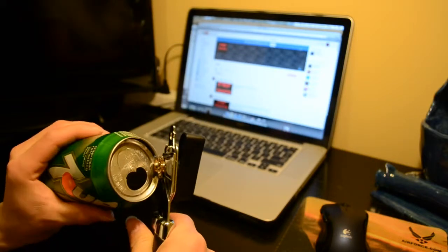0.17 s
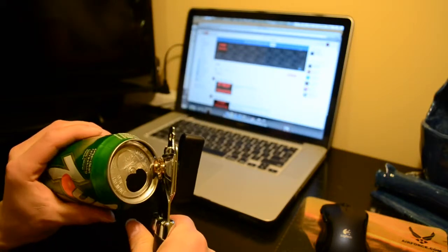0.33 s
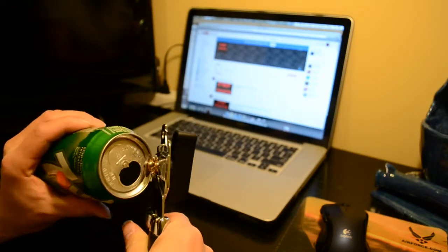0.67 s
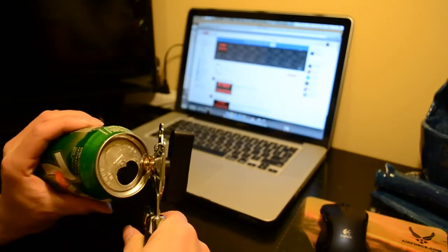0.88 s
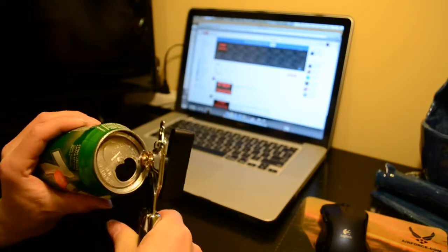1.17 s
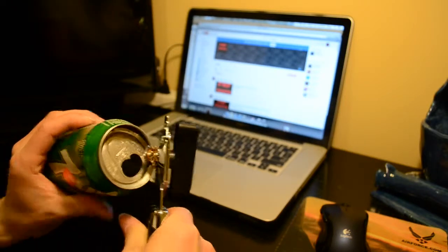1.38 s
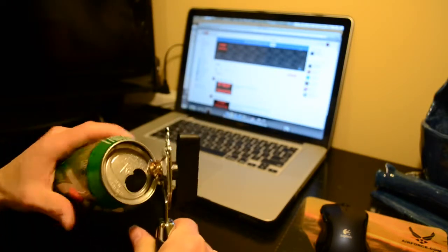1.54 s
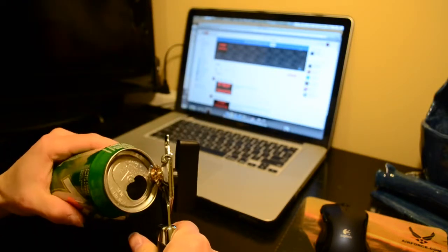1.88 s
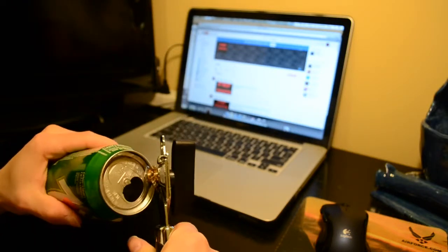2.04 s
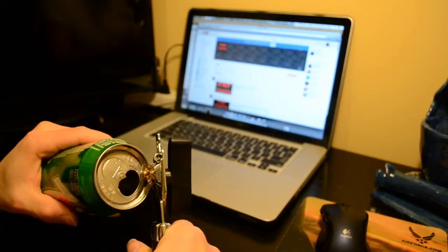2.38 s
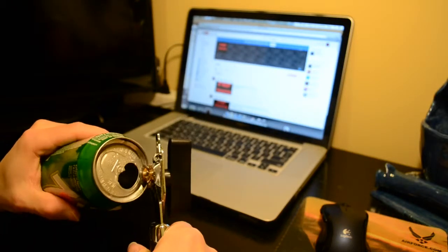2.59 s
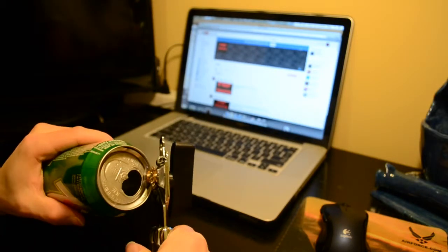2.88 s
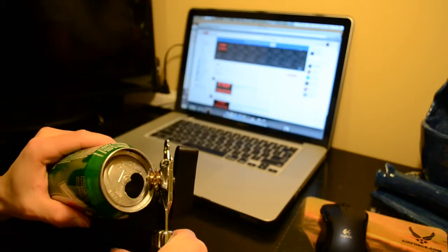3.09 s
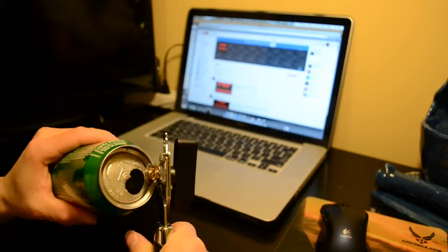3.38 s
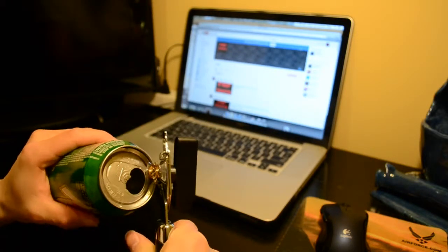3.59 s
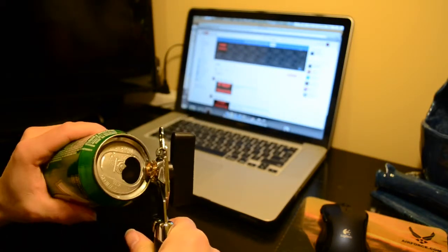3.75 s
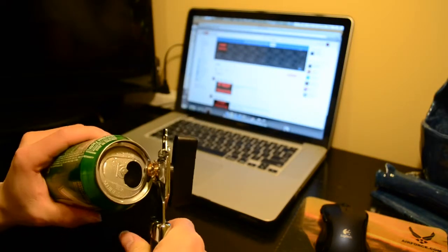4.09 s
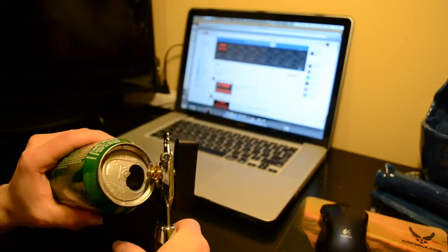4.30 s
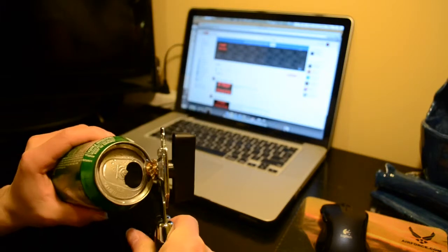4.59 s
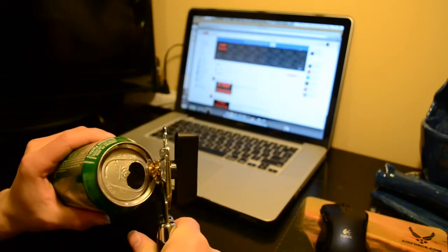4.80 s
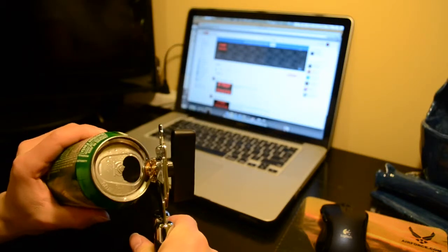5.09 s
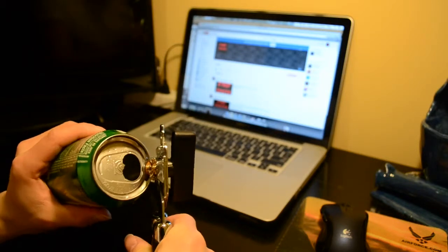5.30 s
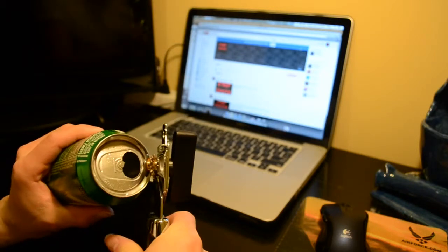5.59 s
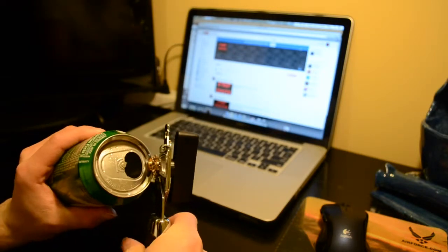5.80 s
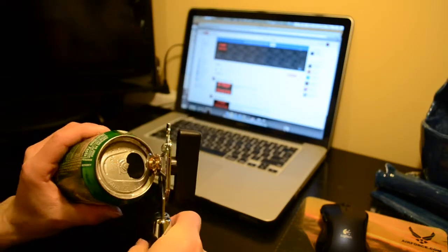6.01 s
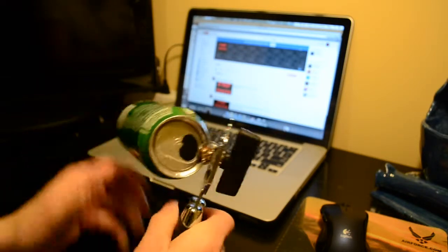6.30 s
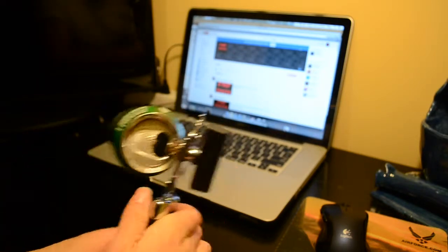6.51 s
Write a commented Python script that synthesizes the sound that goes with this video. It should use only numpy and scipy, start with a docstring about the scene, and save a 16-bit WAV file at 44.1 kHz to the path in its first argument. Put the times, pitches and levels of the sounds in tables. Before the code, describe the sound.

Faint fan air and thin, regular high electronic chirps lie under close metal handling. A thin can strains, cracks and snaps five times at irregular intervals, the fourth loudest, each with a short hollow ring. Tiny steel ticks, short wheel scrapes, dull handle knocks and quiet finger rustle fill the gaps; a hand slides softly at the end. Close microphone, small room, slightly dull top end.

```python
"""A laptop's fan hums and its electronics whine faintly in a small room, modelled as filtered noise and thin tones.
At a desk a hand-held can opener works round the rim of an empty aluminium can: the wheel scrapes, steel parts
tick and the handles knock, each contact a cluster of tiny slips that excites a bank of resonances.
Again and again the lid strains, cracks a little and gives way in a loud snap that sets the hollow can ringing.
At the end one hand slides off the can onto the other, a single swell of fine noise grains."""
import sys
import numpy as np
from scipy import signal
from scipy.fft import rfft, irfft, next_fast_len
from scipy.io import wavfile
from scipy.ndimage import uniform_filter1d

SR = 44100
rng = np.random.default_rng(int(sys.argv[2]) if len(sys.argv) > 2 else 0)


def store_pcm(level_fs):
    """Save levels as 16-bit WAV."""
    pcm = np.round(np.clip(level_fs, -1, 1) * 32767).astype(np.int16)
    wavfile.write(sys.argv[1], SR, np.atleast_2d(pcm).T)


N = 292824

# The lid gives way. Each row: time in seconds, strength in dB, brightness in dB, extra ring of the wall in dB,
# swell and fade in seconds, strength of the first crack in dB, seconds by which that crack leads.
SNAPS = [(0.5182, -38, -8.5, 4, 0.0024, 0.0095, -62, 0.0066),
         (1.2692, -37.5, 13, 5, 0.00067, 0.0047, -61.5, 0.029),
         (3.1853, -29.5, -3, -4.5, 0.0014, 0.002, -50.5, .024),
         (4.3993, -21, -5, -6.5, 0.001, 0.004, -41.5, 0.0072),
         (5.9344, -24.5, 1.5, -1, .0018, .0017, -53.5, 0.027)]
# Borders between the can's hollow, wall, lid and rim ranges, in Hz.
CAN_SPLITS_HZ = [800, 2200, 5000]
# Usual balance of the grinding wheel, in dB for the hollow, wall, lid and rim ranges.
SCRAPE_BALANCE_DB = [0.5, 2, -0.5, -4]

# every contact gets a window of this length and peaks this far into it
LENGTH_S, LEAD_S = 0.45, 0.08


def from_db(db):
    """Decibels to gain."""
    return 10 ** (np.asarray(db) / 20)


def unit(x):
    """Scale to rms 1."""
    return x / np.sqrt(np.mean(x ** 2) + 1e-30)


def add(out, x, s):
    """Mix x into out from time s on."""
    start = round(s * SR)
    out[start:start + len(x)] += x[:N - start]


def smooth(x, decay_s):
    """One-pole lag."""
    pole = np.exp(-1 / (SR * decay_s))
    return signal.lfilter([1 - pole], [1, -pole], x + 1e-18)


def resonate(x, hz, width_hz):
    """A two-pole resonance with gain 1 on top; the narrower it is, the longer it rings."""
    radius = np.exp(-np.pi * width_hz / SR)
    feed = np.array([1, 0, -1]) * (1 - radius ** 2) / 2
    feedback = [1, -2 * radius * np.cos(2 * np.pi * hz / SR), radius ** 2]
    return signal.lfilter(feed, feedback, x + 1e-18)


def colour(x, spectrum):
    """Causal (minimum-phase) filter with the given spectrum of (Hz, dB) points."""
    size = 2 * next_fast_len(len(x) // 2 + 1)
    hz, db = np.transpose(spectrum)
    bins_hz = np.fft.rfftfreq(size, 1 / SR)
    gain = from_db(np.interp(np.log(bins_hz + 1), np.log(hz), db))
    # folding the cepstrum forward in time gives the minimum phase
    cepstrum = irfft(np.log(gain))
    cepstrum[1:size // 2] *= 2
    cepstrum[size // 2 + 1:] = 0
    return irfft(rfft(x, size) * np.exp(rfft(cepstrum)))[:len(x)]


def split(x, edges_hz):
    """Adjoining frequency ranges that sum to x."""
    spectrum, hz = rfft(x), np.fft.rfftfreq(len(x), 1 / SR)
    below = [irfft(spectrum / (1 + (hz / edge) ** 8), len(x)) for edge in edges_hz]
    return np.diff([0 * x, *below, x], axis=0)


def body(modes, spectrum, dense_db):
    """Responses to one click, one row each: the short dense crack, then every resonance."""
    click = signal.unit_impulse(int(LENGTH_S * SR))
    rows = [from_db(dense_db) * colour(click, spectrum)]
    for k, (hz, width_hz, db) in enumerate(modes):
        rows.append((-1) ** k * from_db(db) * resonate(click, hz, width_hz))   # signs alternate
    return np.array(rows)


def contacts(table, responses, splits_hz, tails, slips_per_s, uneven_db, place_db, blow_s):
    """Each contact is a cluster of tiny slips that swells and fades; levels are rms over its loudest blow_s."""
    out = np.zeros(N)
    t = np.arange(int(LENGTH_S * SR)) / SR - LEAD_S
    for s, ranges_db, swell_s, fade_s in table:
        chance = rng.random(len(t))
        sign, size, scatter = rng.standard_normal((3, len(t)))
        force = np.exp(np.minimum(t / swell_s, -t / fade_s)) + 1e-12
        happens = chance < slips_per_s / SR
        slips = force * happens * np.sign(sign) * from_db(uneven_db * np.clip(size, -2, 2))
        # each new place of contact favours other resonances
        response = from_db(place_db * rng.standard_normal(len(responses))) @ responses
        direct = split(signal.fftconvolve(slips, response)[:len(t)], splits_hz)
        diffuse = split(signal.fftconvolve(scatter, response)[:len(t)], splits_hz)
        for near, far, db, (wet_db, t60, build_s) in zip(direct, diffuse, ranges_db, tails):
            # the energy of the slips spreads through body and room and dies away
            energy = smooth(smooth(slips ** 2, build_s), t60 / np.log(1e6))
            tail = far * np.sqrt(energy)
            sound = unit(near) + from_db(wet_db) * unit(tail)
            loudest = np.sqrt(uniform_filter1d(sound ** 2, int(blow_s * SR)).max())
            add(out, from_db(db) * sound / loudest, s - LEAD_S)
    return out


def range_levels(db, bright_db, balance_db):
    """Level of a contact in each of the four ranges, as a harder contact is brighter."""
    # dB gained by each range, low to high, per dB of brightness
    hardness_tilt = [-0.68, -0.26, .2, 0.3]
    return db + np.array(balance_db) + bright_db * np.array(hardness_tilt)


def drawn_contacts(table, balance_db, swell_share):
    """Contacts of one shape, the swell and fade stretched to the length of each."""
    share = np.clip(swell_share, 0.02, 0.98)
    return [(s, range_levels(db, bright_db, balance_db), share * length_s, (1 - share) * length_s)
            for s, db, bright_db, length_s in table]


def can_body(dense_db):
    """The thin can: sharp resonances over dense, quickly damped vibration set by dense_db."""
    # Resonances of the can. Each row: frequency in Hz, width in Hz, level in dB.
    can_modes = [(506.7, 6.3, 8), (1629, 93, -2.5), (1807, 12, -6), (2010, 36, -8.5), (2525, 48, -19),
                 (2894, 92, -1.5), (3146, 140, -9), (3754, 47, -11.5), (3800, 44, -10.5),
                 (4290, 110, -12.5), (4543, 33, -13), (5400, 160, -14), (6110, 67, -8.5), (6830, 27, -15),
                 (7850, 78, -9.5), (8990, 550, -7.5), (9700, 58, -12.5)]
    # Dense vibration between the resonances. Each row: frequency in Hz, level in dB before dense_db.
    can_colour = [(60, -56.5), (170, -37.5), (290, -25.5), (420, -9), (540, -6.5), (760, -17), (1100, -18),
                  (1700, -17), (2300, -16.5), (3100, -12), (5000, -18), (6200, -13.5), (7700, -20),
                  (9300, -25), (10400, -24.5), (11400, -43.5), (13000, -67.5)]
    return body(can_modes, can_colour, dense_db)


def snap_contacts():
    """Each time the lid gives way: (s, range levels, swell, fade)."""
    # Usual balance of a snap, in dB for the hollow, wall, lid and rim ranges.
    snap_balance_db = [-8, -2.5, 2, 0]
    wall = np.array([0, 1, 0, 0])
    return [(s, range_levels(db, bright_db, snap_balance_db) + wall_db * wall, swell_s, fade_s)
            for s, db, bright_db, wall_db, swell_s, fade_s, *_ in SNAPS]


def lid_snaps(can):
    """The lid breaks loose in a dense burst of slips that sets the whole can ringing."""
    # Diffuse tail of body and room, low range to high.
    # Each row: level in dB against the direct sound, t60 in seconds, build-up in seconds.
    snap_tail = [(0.5, .19, 0.003), (-4, 0.18, 0.001), (-8, 0.17, .002), (-11.5, 0.14, 0.0018)]
    return contacts(snap_contacts(), can, CAN_SPLITS_HZ, snap_tail,
                    slips_per_s=5500, uneven_db=3.5, place_db=3.5, blow_s=0.023)


def after_ring():
    """Air in the can and the steel arm ring on after every snap as a few clear decaying tones."""
    # Each row: frequency in Hz, level in dB against the snap's hollow range, t60 in seconds.
    long_rings = [(520, -4.5, .23), (1927, -20, .58), (3130, -10, .22)]
    out, t = np.zeros(N), np.arange(SR) / SR
    tones = sum(from_db(db - 60 * t / t60) * np.sin(2 * np.pi * hz * t) for hz, db, t60 in long_rings)
    onset = 1 - np.exp(-t / 0.0049)
    for s, (hollow_db, *_), *_ in snap_contacts():
        add(out, from_db(hollow_db) * tones * onset, s)
    return out


def tick_contacts():
    """Equally short ticks, and a softer first crack ahead of every snap."""
    # Steel parts tick against the rim. Each row: time in seconds, strength in dB, brightness in dB.
    tick_rows = [(0.162, -67.5, 7), (.231, -63.5, -12.5), (.535, -47.5, 3), (0.583, -65.5, -20),
                 (.71, -61.5, -16), (1.18, -67.5, -12), (1.417, -52, 21), (1.447, -52.5, 2.5),
                 (1.4724, -60, -18), (1.523, -57, -12), (1.6022, -50, 6), (1.696, -62.5, 24),
                 (2.411, -58.5, -2), (2.6993, -47, 4), (3.463, -63, -5), (3.513, -61.5, 23.5),
                 (3.711, -51.5, 0), (3.724, -50, -7), (3.758, -70, -1), (4.92, -59, 9),
                 (6.133, -60.5, 36.5), (6.144, -53, 14), (6.157, -63.5, 62), (6.447, -62.5, -6)]
    # Usual balances of a tick and of a first crack, in dB for the hollow, wall, lid and rim ranges.
    tick_balance_db = [-1, -0.5, 0, -2.5]
    crack_balance_db = [1, -5, 4, -8.5]   # mostly in the lid
    tick_swell_s, tick_fade_s = 0.00044, 0.0018
    crack_swell_s, crack_fade_s = 0.0022, 0.0038
    ticks = [(s, range_levels(db, bright_db, tick_balance_db), tick_swell_s, tick_fade_s)
             for s, db, bright_db in tick_rows]
    cracks = [(s - lead_s, range_levels(db, 0, crack_balance_db), crack_swell_s, crack_fade_s)
              for s, *_, db, lead_s in SNAPS]
    return ticks + cracks


def ticks_and_cracks(rim):
    """Brief bursts of very uneven slips excite the can from its rim."""
    # Diffuse tail, low range to high. Each row: dB against the direct sound, t60 and build-up in seconds.
    tick_tail = [(0, 0.073, 0.0026), (1, 0.03, 0.0019), (-5, 0.18, 0.0025), (-2, 0.088, 0.0015)]
    return contacts(tick_contacts(), rim, CAN_SPLITS_HZ, tick_tail,
                    slips_per_s=4300, uneven_db=8.5, place_db=3.0, blow_s=0.0092)


def strain_contacts():
    """The wheel grinds harder and harder, alike before every snap, and peaks just ahead of it."""
    strain_db, swell_share, peak_lead_s, fade_s = -53.5, 0.4, 0.0082, 0.0058   # share of the first crack's lead
    return [(s - peak_lead_s, range_levels(strain_db, 0, SCRAPE_BALANCE_DB), swell_share * lead_s, fade_s)
            for s, *_, lead_s in SNAPS]


def wheel_scrapes(pressed):
    """The wheel grinds along the rim in sparse slips, each place exciting the can differently."""
    # Scrapes. Each row: time of the peak in seconds, strength in dB, brightness in dB, length in seconds.
    scrape_rows = [(.68, -64.5, -5, 0.043), (.79, -66, -1, 0.028), (1.11, -66.5, 0, 0.087),
                   (1.235, -68, -14, 0.017), (1.488, -65.5, -20, 0.024), (1.555, -63, -7, .035),
                   (2.296, -52, 1, 0.051), (2.435, -58, -6.5, 0.034), (2.59, -63.5, 0, 0.019),
                   (2.626, -56, -3, 0.025), (2.9, -69.5, 0.5, 0.066), (3.735, -52.5, -10, 0.039),
                   (3.946, -60, 0, .014), (4.185, -66.5, -9, 0.022), (4.946, -55, -5, 0.039),
                   (5.187, -61, -3, 0.042), (6.172, -57.5, -2, .027), (6.225, -69.5, 41, .024)]
    # Diffuse tail, low range to high. Each row: dB against the direct sound, t60 and build-up in seconds.
    scrape_tail = [(1, 0.066, 0.0043), (-4, .19, 0.0028), (-5.5, 0.16, 0.0022), (-3, 0.12, 0.0015)]
    wheel = drawn_contacts(scrape_rows, SCRAPE_BALANCE_DB, swell_share=0.55) + strain_contacts()
    return contacts(wheel, pressed, CAN_SPLITS_HZ, scrape_tail,
                    slips_per_s=1100, uneven_db=4.0, place_db=6.0, blow_s=0.0037)


def handle_knocks():
    """The handles knock with a quick swell and longer fade, through their own broad resonances."""
    # Knocks. Each row: time of the peak in seconds, strength in dB, brightness in dB, length in seconds.
    knock_rows = [(.296, -64, -13, 0.0031), (1.667, -38.5, 2.5, 0.0052), (2.927, -66, 10, 0.021),
                  (3.04, -80, -18, 0.016), (3.3095, -45.5, 10, .005), (3.523, -60, -20, 0.0034),
                  (3.7, -70, -13, 0.014), (4.061, -71, -16.5, 0.0066), (4.109, -70.5, 7, 0.011),
                  (4.622, -70.5, 0, 0.063), (5.335, -69.5, -6, 0.0098), (5.405, -72.5, -18, 0.026)]
    # Usual balance, in dB for the handles' thump, body, clack and edge ranges; then their borders in Hz.
    knock_balance_db = [-6.5, 7, 4, -9]
    handle_splits_hz = [300, 800, 2200]
    # Diffuse tail, low range to high. Each row: dB against the direct sound, t60 and build-up in seconds.
    knock_tail = [(4.5, 0.29, 0.0018), (1, 0.21, 0.0048), (-5, .16, 0.0037), (-4.5, 0.12, .002)]
    # Resonances. Each row: frequency in Hz, width in Hz, level in dB.
    handle_modes = [(167.6, 11, -6.5), (519, 20, -2), (1032, 120, -8), (1490, 300, -6), (1993, 320, -7),
                    (2550, 640, -19)]
    # Dense, quickly damped vibration. Each row: frequency in Hz, level in dB before dense_db.
    handle_colour = [(50, -44.5), (90, -32), (150, -7), (260, -5), (480, 1), (1250, -4.5), (2500, -12),
                     (5000, -16.5), (11000, -72.5)]
    handles = body(handle_modes, handle_colour, dense_db=-7.5)
    blows = drawn_contacts(knock_rows, knock_balance_db, swell_share=0.11)
    return contacts(blows, handles, handle_splits_hz, knock_tail,
                    slips_per_s=6600, uneven_db=12, place_db=7.5, blow_s=0.016)


def stroke(start_s, hold_s, attack_s, release_s):
    """Gain that rises to 1 by start_s, holds and falls."""
    t = np.arange(N) / SR - start_s
    rise = 1 + t / attack_s
    fall = 1 - (t - hold_s) / release_s
    return np.clip(np.minimum(rise, fall), 0, 1)


def rustle(gain, spectrum, response, grains_per_s):
    """Skin creeps over a surface in countless tiny slips."""
    grains = rng.standard_normal(N) * (rng.random(N) < grains_per_s / SR)
    sound = colour(signal.fftconvolve(grains, response)[:N], spectrum)
    return gain * unit(sound)


def finger_motion():
    """Gain of the fingers' rustle: a steady creeping hold, and a stroke for each shift of grip."""
    # Shifts on the can. Each row: time of full level in seconds, length of the hold in seconds, level in dB.
    regrips = [(0, 0.86, -70.5), (1.488, 0.088, -62.5), (6.263, 0.22, -71)]
    holding_db, attack_s, release_s = -79, 0.22, 0.19
    shifts = sum(from_db(db) * stroke(s, length_s, attack_s, release_s) for s, length_s, db in regrips)
    return from_db(holding_db) + shifts


def finger_grip(can):
    """Fingers creep and shift on the can, which resonates with their slips."""
    skin_colour = [(200, 4), (500, -0.5), (1500, 1.5), (9000, -9.0)]   # (Hz, relative dB)
    return rustle(finger_motion(), skin_colour, can.sum(axis=0), grains_per_s=3600)


def hand_slide():
    """Skin slides over skin and steel in one stroke of dense grains."""
    # Colour of the slide. Each row: frequency in Hz, relative level in dB.
    slide_colour = [(200, -21.5), (850, -14), (1500, -4), (2100, -7.5), (4500, -12.5), (7500, -26.5),
                    (11000, -37)]
    hand = from_db(-57) * stroke(start_s=6.32, hold_s=0.14, attack_s=0.1, release_s=0.075)
    return rustle(hand, slide_colour, [1], grains_per_s=15000)


def laptop_fan(air_db=-67):
    """Broad noise of fan and room air, with the fan's whistles as narrow bands of noise."""
    # Colour of the air. Each row: frequency in Hz, relative level in dB per Hz.
    air_colour = [(20, -6), (60, -11), (120, -6.5), (250, 2.5), (800, 1), (1500, -3), (2300, -7.5),
                  (3700, -12), (5200, -16.5), (8000, -24.5), (9300, -23), (11500, -41.5)]
    # Whistles. Each row: frequency in Hz, width in Hz of each of two filter passes, level in dB rms.
    whistles = [(118, 20, -88.5), (243.5, 8.3, -80), (722, 6, -78.5), (2610, 47, -76.5), (2720, 140, -80.5),
                (4470, 240, -79), (4730, 135, -85.5), (8720, 110, -91.5)]
    out = from_db(air_db) * unit(colour(rng.standard_normal(N), air_colour))
    for hz, width_hz, db in whistles:
        once = resonate(rng.standard_normal(N), hz, width_hz)
        out += from_db(db) * unit(resonate(once, hz, width_hz))
    return out


def laptop_whine(chirp_db=-77, chirp_hz=9400, bend_hz=220, half_s=0.061, waver_hz=90):
    """The electronics chirp at a steady pace, a thin tone that arches up and down and wavers."""
    first_s, every_s = 0.855, 1.138   # middles of the chirps
    out = np.zeros(N)
    arch = np.linspace(-1, 1, int(2 * half_s * SR)) ** 2
    for s in np.arange(first_s, N / SR, every_s):
        waver = unit(uniform_filter1d(rng.standard_normal(len(arch)), size=80))
        pitch = chirp_hz - bend_hz * arch + waver_hz * waver
        tone = np.sin(2 * np.pi * np.cumsum(pitch) / SR)
        add(out, from_db(chirp_db) * np.sqrt(1 - arch) * tone, s - half_s)
    return out


def scene():
    """Can and opener close to the microphone, the laptop behind them."""
    can = can_body(dense_db=0.0)
    rim = can_body(dense_db=5)
    pressed = can_body(dense_db=7.5)   # the wheel, pressed to the rim, damps the can's resonances
    out = lid_snaps(can) + after_ring()
    out += ticks_and_cracks(rim)
    out += wheel_scrapes(pressed)
    out += handle_knocks()
    out += finger_grip(can) + hand_slide()
    out += laptop_fan() + laptop_whine()
    return out[None]


def record(dry, lopsided=0.069, ceiling=0.9):
    """The microphone bends the loudest peaks unevenly, which adds a soft thump; the top is cut."""
    bent = ceiling * np.tanh((dry + lopsided * dry ** 2) / ceiling)
    softened = signal.sosfilt(signal.butter(8, 10800, fs=SR, output="sos"), bent)
    # a steep cut at 11.8 kHz
    return signal.sosfilt(signal.ellip(10, 0.3, 70, 11800, fs=SR, output="sos"), softened)


dry = scene()
out = record(dry)
store_pcm(out)
```